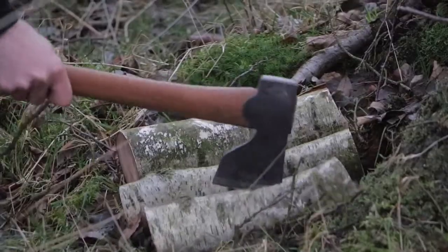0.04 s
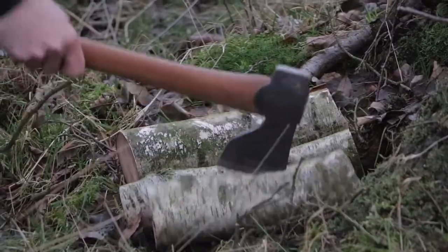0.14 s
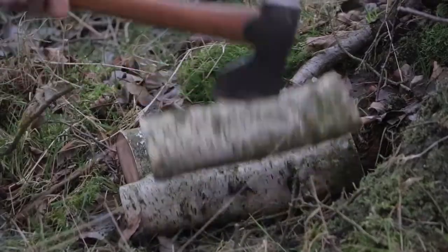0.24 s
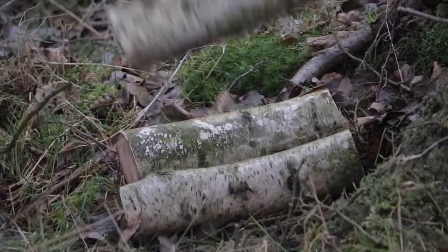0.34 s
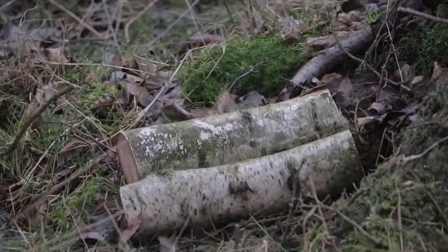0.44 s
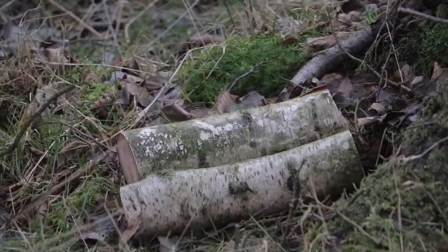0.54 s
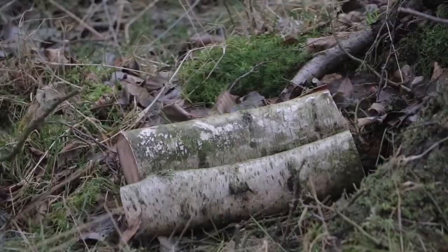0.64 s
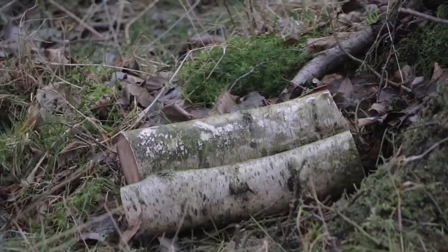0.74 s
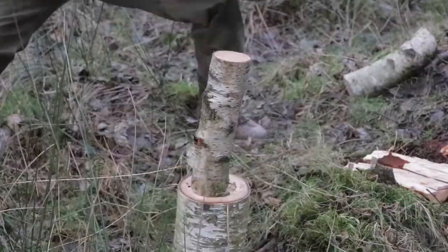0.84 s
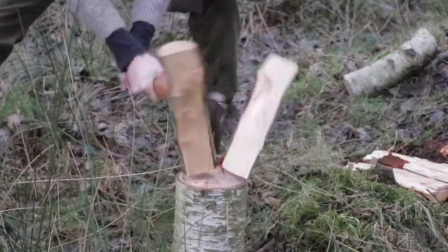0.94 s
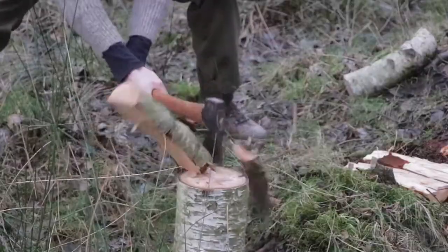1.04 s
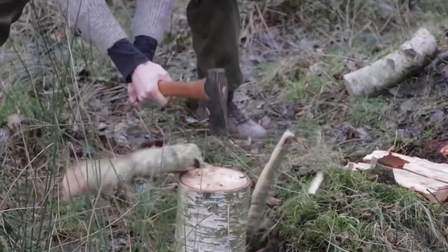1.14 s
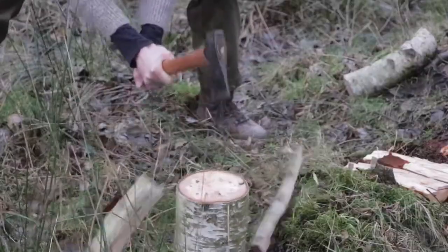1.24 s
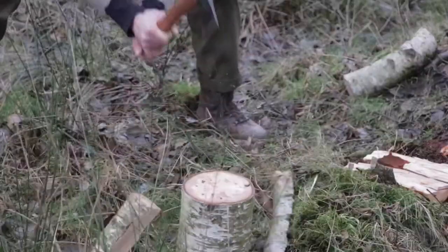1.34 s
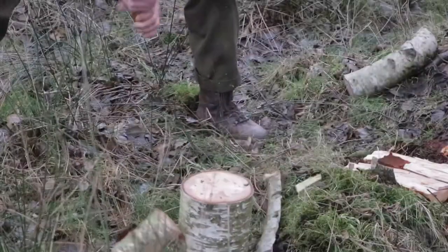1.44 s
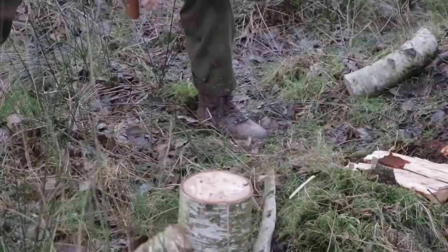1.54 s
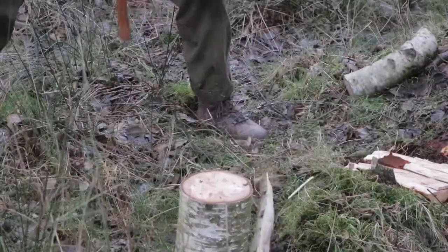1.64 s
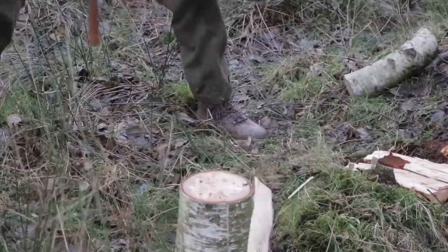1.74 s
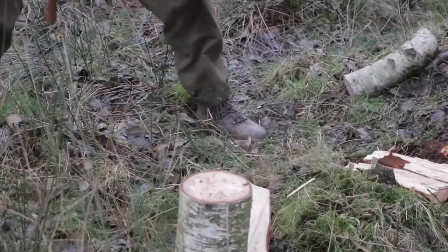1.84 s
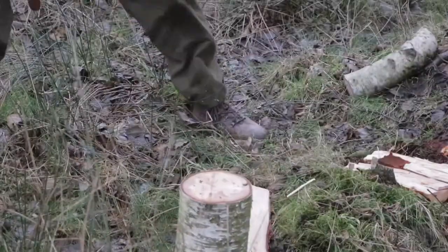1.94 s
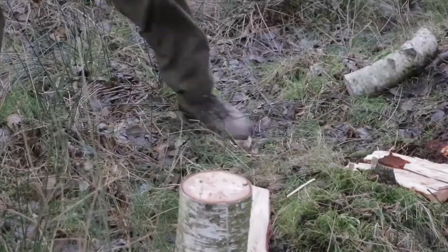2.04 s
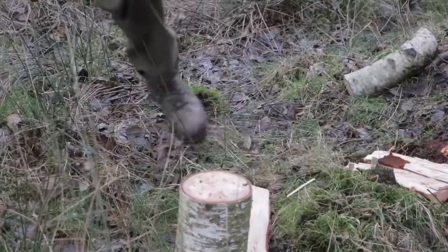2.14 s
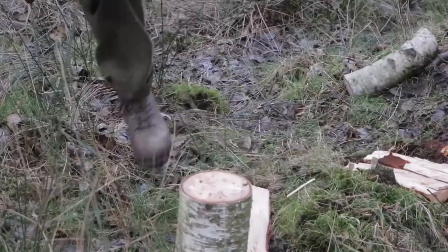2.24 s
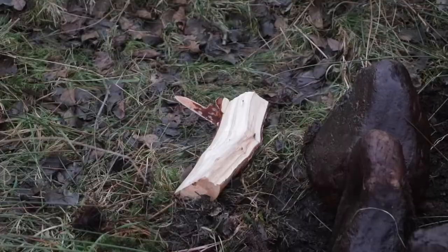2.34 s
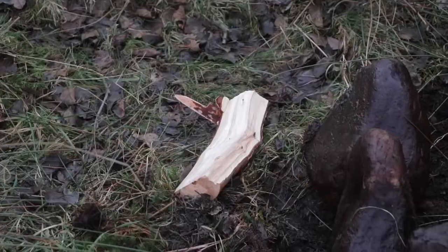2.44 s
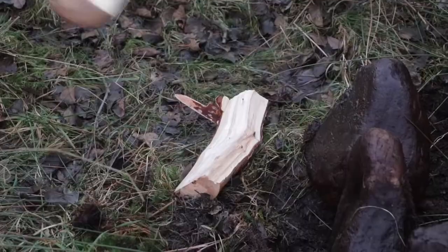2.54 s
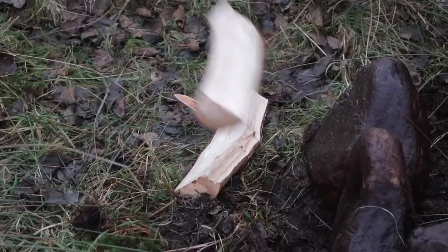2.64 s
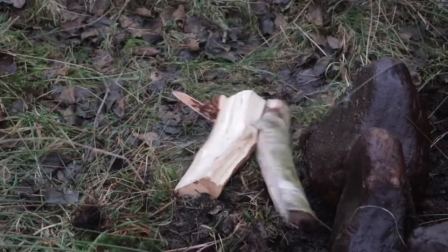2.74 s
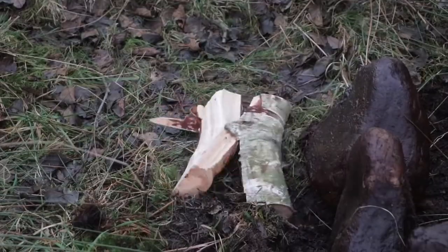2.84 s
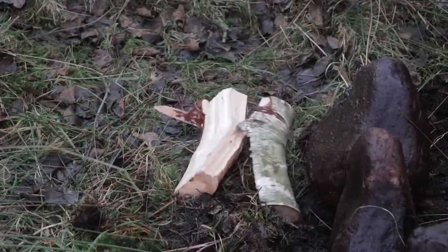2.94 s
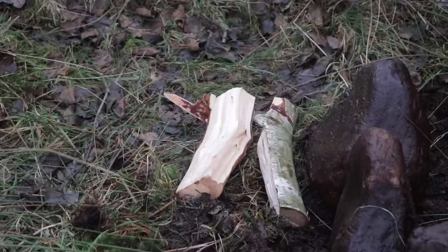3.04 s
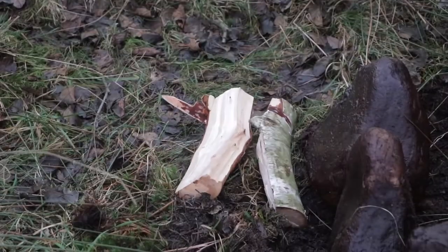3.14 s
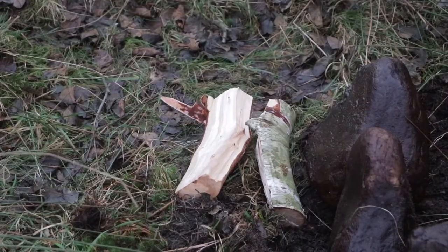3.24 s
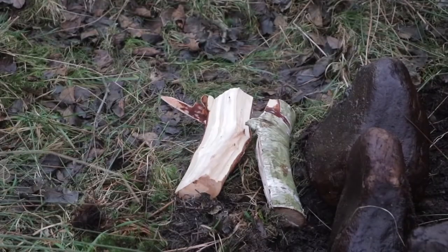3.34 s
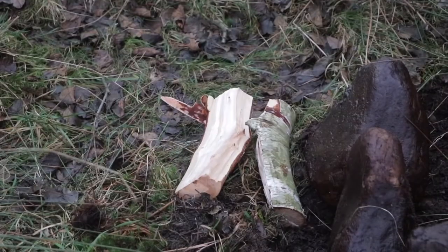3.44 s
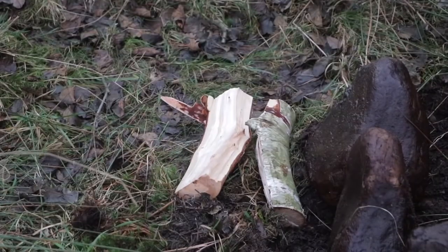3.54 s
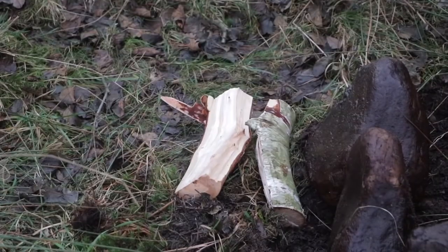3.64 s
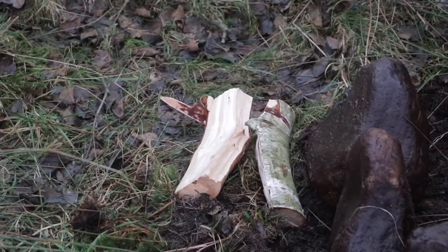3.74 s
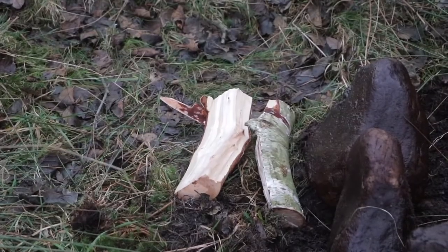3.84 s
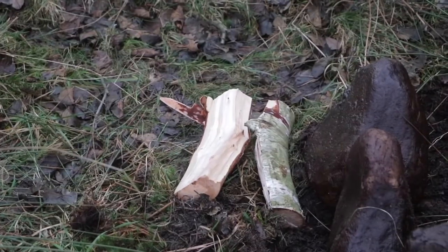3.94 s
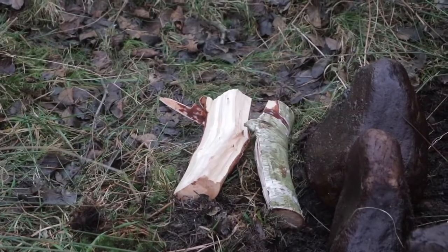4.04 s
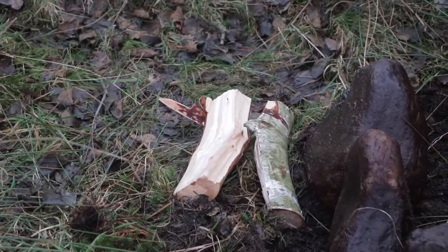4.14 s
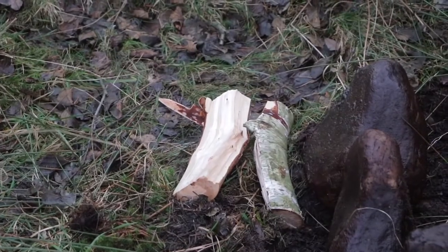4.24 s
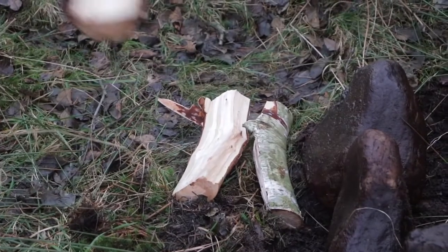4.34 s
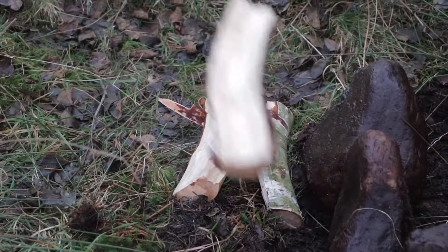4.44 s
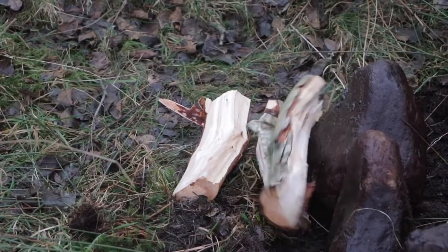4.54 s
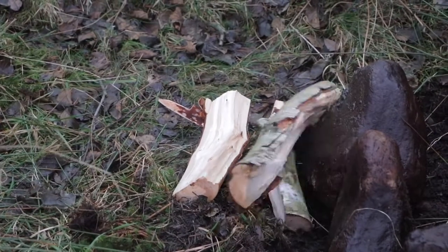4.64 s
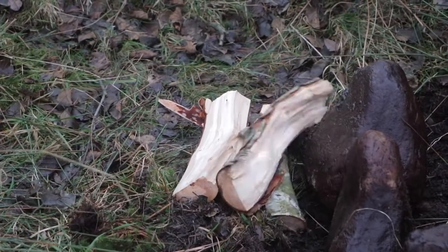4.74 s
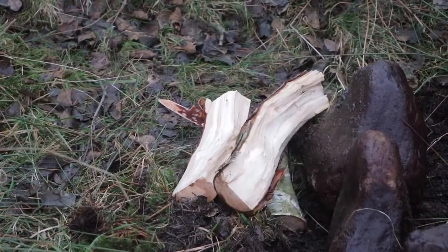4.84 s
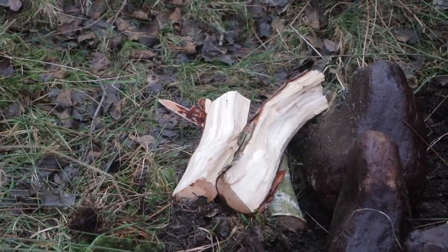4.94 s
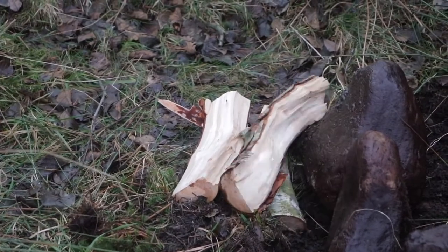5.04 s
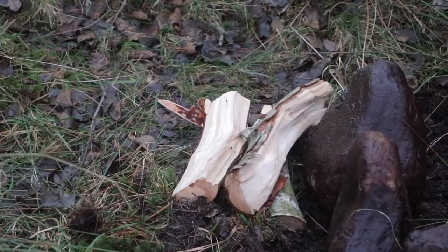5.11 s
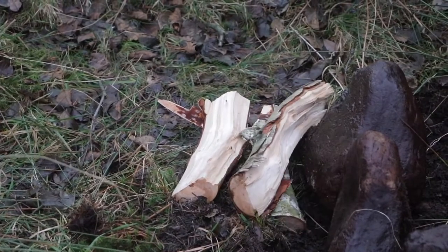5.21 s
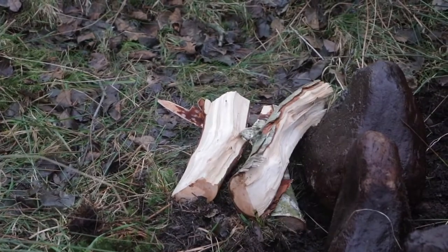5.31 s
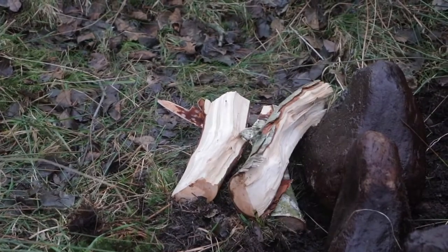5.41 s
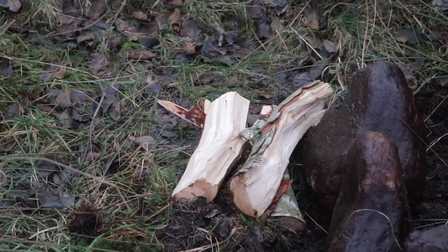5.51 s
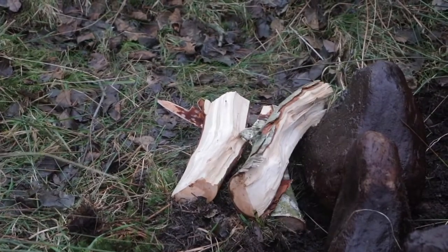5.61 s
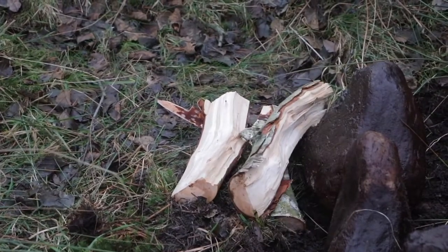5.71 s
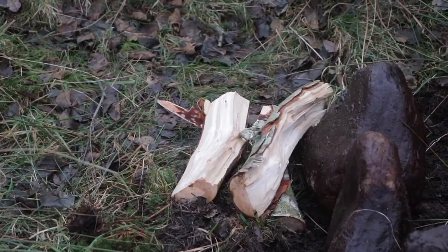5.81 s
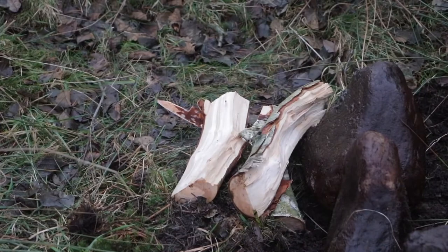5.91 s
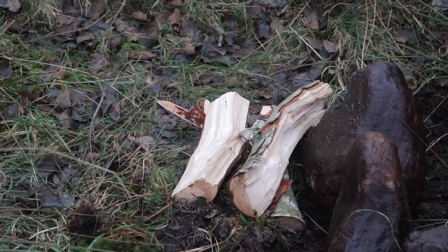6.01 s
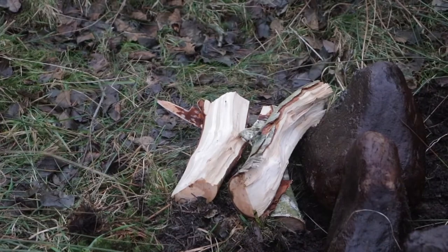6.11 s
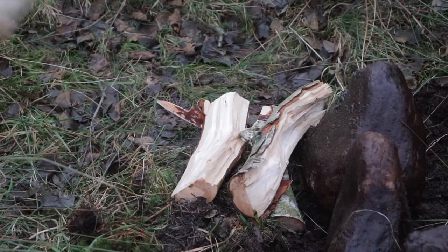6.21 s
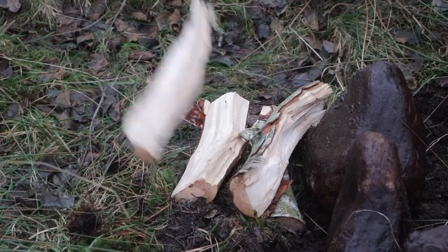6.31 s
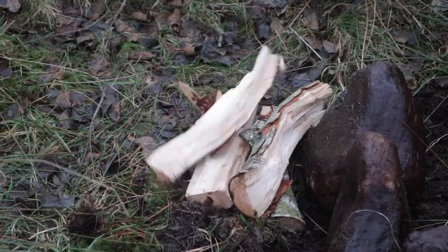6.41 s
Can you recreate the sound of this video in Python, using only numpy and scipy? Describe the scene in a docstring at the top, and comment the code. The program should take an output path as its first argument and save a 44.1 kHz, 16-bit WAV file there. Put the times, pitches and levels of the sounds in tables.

```python
"""Splitting firewood in damp woodland

A hatchet splits a birch billet on a block: thuds, cracks, ringing wood modes and a burst of tearing grain.
Split pieces are tossed on a small pile, where they knock, bounce and settle; bark snaps, scrapes and crumbles
as short bursts of filtered grit. Shaped noise makes the wind rumble on the microphone over a soft outdoor
hiss, both dropping out twice for an instant. The woodland adds a short echo; the loudest blows overload."""
import sys
import numpy as np
from scipy import signal
from scipy.fft import rfft, irfft, next_fast_len
from scipy.io import wavfile
from scipy.ndimage import map_coordinates

SR = 44100
rng = np.random.default_rng(int(sys.argv[2]) if len(sys.argv) > 2 else 0)


def file_out(sig):
    """Save sig as 16-bit WAV at sys.argv[1]."""
    # one column per channel
    cols = np.atleast_2d(sig).T
    # limit, then scale
    lim = np.clip(cols, -1, 1)
    pcm = np.round(lim * 32767).astype(np.int16)
    wavfile.write(sys.argv[1], SR, pcm)


N = 285327  # samples

# Colour of the low wind buffeting: f/Hz, relative level/dB per Hz
BUFFET_SPECTRUM = [(10, -2), (22, 1), (36, 3.5), (52, -3), (100, -13), (160, -25.5), (400, -70.5)]
# Colour of the finer wind flutter: f/Hz, relative level/dB per Hz
FLUTTER_SPECTRUM = [(50, -17.5), (110, 1), (200, -5), (300, -12.5), (500, -26.5), (1200, -64)]
# Gusts on the microphone: peak t/s, rise time/s, buffet level/dB, flutter level/dB
GUSTS = [(0.124, 1, -30, -37.5), (0.654, .15, -17.5, -30), (1.053, .08, -34.5, -62.5),
         (1.337, 0.15, -32.5, -50), (2.08, 0.31, -38, -51.5), (3.409, .11, -34.5, -50),
         (3.725, 0.14, -42, -58.5), (3.96, 0.074, -33.5, -50), (4.233, 0.091, -28, -33),
         (4.402, 0.22, -32, -47), (4.886, 0.0902, -41.5, -54.5), (5.368, 0.0763, -43.5, -63.5)]
# Stretches of outdoor air: start t/s, end t/s, hiss level/dB, hiss colour as (f/Hz, relative level/dB per Hz)
AIR_STRETCHES = [(0, .834, -47.5, [(200, -9), (350, -4.5), (750, -3), (1550, -9), (2200, -14),
                 (6750, -22.5), (10000, -29.5), (16000, -31.5)]), (0.87, 2.371, -52, [(150, -8.5),
                 (350, -1.5), (1200, -1), (3400, -11), (6500, -13), (8500, -18), (16000, -21.5)]),
                 (2.404, 6.5, -54.5, [(120, -14), (400, -6.5), (1000, -5.5), (1500, -10), (2800, -17.5),
                 (4200, -19.5), (6500, -20), (8500, -25.5), (16000, -27.5)])]
# Decay of the far woodland tail: f/Hz, t60/s
WOODLAND_DECAY = [(200, 0.13), (1200, 0.94), (4000, 0.32), (12000, 0.084)]
# Trickling chips and bark crumbs: start t/s, end t/s, rate/ticks per s, softest level/dB, middle f/Hz
CRUMBS = [(1.042, 1.21, 60, -52.5, 7000), (4.951, 5.754, 28, -56.5, 3800)]
# Wood scraping over bark and grass: middle t/s, half length/s, peak level/dB, centre f/Hz
SCRAPES = [(1.023, 0.046, -39, 1960), (1.019, .04, -41.5, 8870), (1.385, 0.018, -48.5, 6420),
           (1.531, 0.12, -58.5, 1590), (1.844, 0.0215, -53, 8160), (2.18, .12, -60.5, 11900),
           (5.136, 0.017, -52.5, 2550), (5.176, 0.011, -36, 2024), (5.456, 0.019, -54.5, 2507),
           (5.644, 0.13, -64, 4507)]
# Twigs and bark snapping: t/s, level/dB, centre f/Hz
SNAPS = [(0.057, -33.5, 3680), (0.75, -29.5, 3860), (1.1019, -32, 5820), (1.114, -41, 9390),
         (2.9, -45.5, 3400), (3.6606, -44, 9950), (3.872, -35.5, 3100), (4.714, -44, 3920),
         (5.062, -36.5, 2570), (5.076, -41.5, 9100), (5.186, -39.5, 4480), (5.2839, -39.5, 3400),
         (5.336, -44, 4900), (5.3921, -32.5, 2723)]
# Nominal ringing modes of each piece of wood: f/Hz, level/dB within the ring, t60/s
WOOD_MODES = { "billet": [(720, -5.5, .035), (849.4, -5.5, 0.019), (1096, 0.5, .025), (1346, -2.5, 0.052),
              (1764, -3, 0.057), (1997, -2, 0.048), (2214, -3, 0.045), (2335, -8, .04), (2910, -5.5, 0.053),
              (3270, -7.5, 0.044), (4384, -11, 0.017), (8080, -16.5, .05)], "round": [(481, -0.5, 0.0051),
              (840, -29, 0.036), (1150, -10.5, 0.077), (1372, -7, 0.07), (1604, 2.5, 0.022),
              (2845, -18.5, 0.059), (3460, 2.5, 0.006), (4970, -20, 0.022)], "split": [(732, 4, 0.02),
              (1063, 4, 0.013), (1154, -5.5, 0.03), (1460, -7, 0.036), (1670, -13.5, 0.0512),
              (1877, -3.5, 0.029), (2653, -20.5, 0.0385), (3010, -11.5, 0.026)], "sliver": [(785, 7, 0.065),
              (1845, 7.5, 0.0455)], "stick": [(906, -9, 0.051), (1154, -1, 0.18), (1970, -6, 0.022),
              (3040, -5.5, 0.0058)]}
# How each piece takes a contact: ring level over a thud at RING_REF_HZ/dB, crack centre f/Hz, crack t60/s
SURFACE = {"billet": (-15, 7000, 0.0053), "round": (-11, 6400, 0.011), "split": (-6.5, 4500, 0.013),
           "sliver": (-1, 3400, 0.062), "stick": (3.3, 4400, 0.0234)}
# Wood struck or landing: t/s, piece, thud level/dB, thud f/Hz, crack level/dB
KNOCKS = [(0.9748, "billet", 2.5, 842, -2), (0.9785, "billet", -3.5, 1500, -2),
          (0.982, "billet", -14, 392, -2), (1.039, "billet", -20, 790, -3.5),
          (1.044, "billet", -29.5, 1610, -23), (1.0734, "billet", -33.5, 800, -48),
          (1.0887, "billet", -24.5, 680, -52), (1.135, "billet", -29, 550, -52),
          (1.1419, "sliver", -43, 800, -45), (1.2016, "billet", -32, 600, -46),
          (1.382, "billet", -39.5, 383, -46), (2.8136, "round", -5.5, 720, -19),
          (2.8258, "round", -9, 628, -31), (2.8348, "round", -19, 1220, -25),
          (2.8455, "round", -27.5, 610, -46), (4.6087, "split", -4.5, 990, -16),
          (4.6115, "split", -13, 710, -14), (4.622, "split", -16, 1100, -18),
          (4.6256, "split", -6, 490, -15.5), (4.628, "split", -9.5, 552, -7),
          (4.6475, "split", -25.5, 611, -19.5), (6.4636, "stick", -14.5, 700, -28)]
# Microphone response: f/Hz, level/dB
MICROPHONE = [(8500, -0.5), (10500, -6.5), (13000, -5.5), (16000, -13.5)]

GUST_FALL, GUST_SHAPE = .9, 1.7  # fall time over rise time; roundness of the peak
BREEZE_BUFFET_DB, BREEZE_FLUTTER_DB = -55, -69  # the floor between gusts
EDDY_RATE_HZ, EDDY_DB = 18, 2.5  # how fast and how deep the flutter lumps
HUM_S, HUM_HALF_LENGTH_S, HUM_DB, HUM_HZ = .22, .067, -32, 196.5
SNAP_T60_S = 0.01
TEAR_S, TEAR_HOLD_S, TEAR_T60_S, TEAR_DB, TEAR_HZ = 0.9763, .008, .03, -8, 2250
SPLINTERS_DB, SPLINTERS_T60_S = -25.5, 0.43  # level relative to the tear
RING_REF_HZ = 700
RING_DB_PER_OCTAVE = 9  # a harder contact has a higher thud and rings more
TOP_HZ = 16200  # the recorder's band limit


def amp(db):
    """Decibels to amplitude."""
    return 10 ** (np.asarray(db) / 20)


def unit(x):
    """Scale to rms 1."""
    return x / np.sqrt(np.mean(x ** 2) + 1e-20)


def along(points, hz):
    """Read a curve of (f/Hz, value) points on a log frequency axis."""
    f, v = np.transpose(points)
    return np.interp(np.log(hz + 1), np.log(f + 1), v)


def filtered(x, response):
    """Shape x by a response given as a function of frequency."""
    m = next_fast_len(len(x) + 8192)
    spectrum = rfft(x, m) * response(np.fft.rfftfreq(m, 1 / SR))
    return irfft(spectrum, m)[:len(x)]


def noise(spectrum):
    """Steady noise of rms 1 with the given colour."""
    return unit(filtered(rng.standard_normal(N), lambda hz: amp(along(spectrum, hz))))


def crunch(centre_hz, q, spiky, size):
    """Dense tiny fractures of uneven strength through two equal band-passes, rms 1."""
    grains = rng.standard_normal(size) * np.exp(spiky * rng.standard_normal(size))

    def band(f):
        return 1j * f / (centre_hz ** 2 - f * f + 1j * f * centre_hz / q) * centre_hz

    return unit(filtered(grains, lambda f: band(f) ** 2))


def add(track, s, sound):
    """Mix a sound into the track at time s."""
    room = track[max(round(s * SR), 0):][:len(sound)]
    room += sound[:len(room)]


def wind(t):
    """Gusts swell out of a breeze and buffet the microphone; finer eddies flutter in lumps, one hums early."""
    buffet_power, flutter_power = amp(BREEZE_BUFFET_DB) ** 2, amp(BREEZE_FLUTTER_DB) ** 2
    for s, rise, buffet_db, flutter_db in GUSTS:
        distance = np.maximum(s - t, (t - s) / GUST_FALL) / rise
        swell = np.exp(-distance ** GUST_SHAPE)
        buffet_power = buffet_power + (amp(buffet_db) * swell) ** 2
        flutter_power = flutter_power + (amp(flutter_db) * swell) ** 2
    buffet = np.sqrt(buffet_power) * noise(BUFFET_SPECTRUM)
    eddies = map_coordinates(rng.standard_normal(size=400), [t * EDDY_RATE_HZ])
    flutter = np.sqrt(flutter_power) * unit(amp(EDDY_DB * eddies) * noise(FLUTTER_SPECTRUM))
    hum_swell = np.exp(-((t - HUM_S) / HUM_HALF_LENGTH_S) ** 2)
    hum = amp(HUM_DB) * hum_swell * np.sin(2 * np.pi * HUM_HZ * t)
    return buffet + flutter + hum


def outdoors():
    """Wind and far hiss, falling silent for an instant between stretches."""
    t = np.arange(N) / SR
    gusts, out = wind(t), np.zeros(N)
    for start, end, db, spectrum in AIR_STRETCHES:
        gate = np.clip(np.minimum(t - start, end - t) / 0.0017, 0, 1)  # 1.7 ms ramps
        out += gate * (gusts + amp(db) * noise(spectrum))
    return out


def woodland(x, near_db, far_db):
    """Ground and brush scatter the sound almost at once; trunks return a faint longer tail."""
    hz, t, z = signal.stft(rng.standard_normal(SR // 2), SR, nperseg=256)
    decay = amp(-60 * t / along(WOODLAND_DECAY, hz)[:, None])
    far = signal.istft(z * decay, SR, nperseg=256)[1]
    age = np.arange(len(far)) / SR
    near = rng.standard_normal(len(far)) * amp(-60 * age / .06) * (age > .002)
    answer = amp(near_db) * near / np.linalg.norm(near) + amp(far_db) * far / np.linalg.norm(far)
    return signal.fftconvolve(x, answer)[:N]


def crumbs():
    """Faint separate ticks at random moments while chips fall and the pile settles."""
    out, t = np.zeros(N), np.arange(SR // 40) / SR
    for start, end, rate, db, hz in CRUMBS:
        count = int((end - start) * rate)
        for when, strength, pitch in rng.random((count, 3)):
            tick_hz = hz * 2 ** (pitch - .5)  # up to half an octave either way
            tick = crunch(tick_hz, q=0.32, spiky=0.35, size=len(t)) * amp(-60 * t / 0.017)
            add(out, start + when * (end - start), amp(db + 10 * strength) * tick)
    return out


def scrapes():
    """Sliding wood: a swell of gritty friction."""
    out, t = np.zeros(N), np.arange(SR // 2) / SR - 1 / 4
    for s, half_length, db, hz in SCRAPES:
        swell = np.exp(-2 * (t / half_length) ** 2)
        grit = crunch(hz, q=1.162, spiky=0.5995, size=len(t))
        add(out, s + t[0], amp(db) * swell * grit)
    return out


def crack(db, hz, t60, q):
    """Breaking fibres: a sharp burst, then a weak trail of crumbling bark."""
    t = np.arange(SR // 4) / SR
    burst, trail = amp(-60 * t / t60), amp(-29 - 60 * t / 0.14)
    onset = 1 - np.exp(-t / .00015)
    return amp(db) * (burst + trail) * onset * crunch(hz, q=q, spiky=0.13, size=len(t))


def snaps():
    """Single twigs and flakes of bark give way, each with one short crack."""
    out = np.zeros(N)
    for s, db, hz in SNAPS:
        add(out, s, crack(db, hz, SNAP_T60_S, q=.65))
    return out


def tear():
    """The first blow tears the billet along its grain at full strength, then leaves a trail of splinters."""
    out, t = np.zeros(N), np.arange(SR // 3) / SR
    split = amp(-60 * np.maximum(t - TEAR_HOLD_S, 0) / TEAR_T60_S)
    splinters = amp(SPLINTERS_DB - 60 * t / SPLINTERS_T60_S)
    grain = crunch(TEAR_HZ, q=.62, spiky=0.33, size=len(t))
    add(out, TEAR_S, amp(TEAR_DB) * (split + splinters) * grain)
    return out


def ringing(piece, t):
    """Decaying modes; each contact supports the wood differently, shifting their pitch and level a little."""
    ring = np.zeros(len(t))
    for k, (hz, db, t60) in enumerate(WOOD_MODES[piece]):
        fade = amp(db + 2 * rng.standard_normal() - 60 * t / t60)
        tone = np.sin(2 * np.pi * hz * rng.normal(1, 0.016) * t)
        ring += (-1) ** k * fade * tone  # neighbouring modes start in opposite directions
    return ring * (1 - np.exp(-t / 0.0001))


def knocks():
    """Each contact shoves the wood in a brief swinging thud, cracks its surface and leaves its modes ringing."""
    out, t = np.zeros(N), np.arange(SR // 4) / SR
    for s, piece, thud_db, thud_hz, crack_db in KNOCKS:
        lively_db, crack_hz, crack_t60 = SURFACE[piece]
        ring_db = thud_db + lively_db + RING_DB_PER_OCTAVE * np.log2(thud_hz / RING_REF_HZ)
        ring = amp(ring_db) * ringing(piece, t)
        swing = t * thud_hz / 1.02  # the thud peaks after about one cycle
        thud = amp(thud_db) * (swing * np.exp(1 - swing)) ** 4.1 * np.sin(2 * np.pi * thud_hz * t)
        add(out, s, ring + thud + crack(crack_db, crack_hz, crack_t60, q=.42))
    return out


def scene():
    """All the wood sounds with their woodland echo, over the outdoor air."""
    wood = knocks() + tear() + snaps() + scrapes() + crumbs()
    return (wood + woodland(wood, near_db=-15, far_db=-36.0) + outdoors())[None]


def record(dry):
    """The microphone dulls the top; the recorder rounds off peaks near full scale and limits the band."""
    heard = filtered(dry[0], lambda hz: amp(along(MICROPHONE, hz)))
    clipped = heard / (1 + np.abs(heard) ** 8) ** (1 / 8)
    return filtered(clipped, lambda hz: 1 / (1 + (hz / TOP_HZ) ** 120))[None]


dry = scene()
out = record(dry)
file_out(out)
```